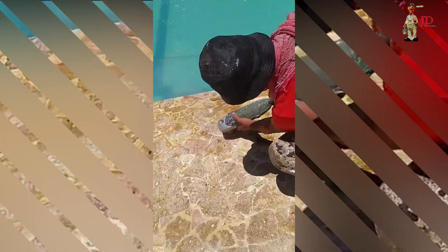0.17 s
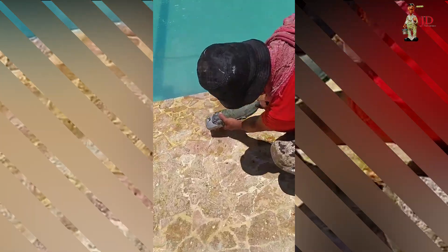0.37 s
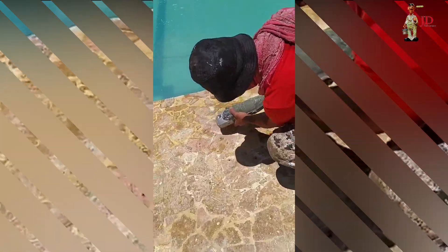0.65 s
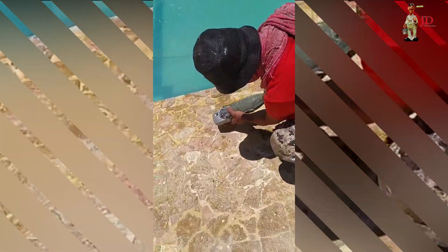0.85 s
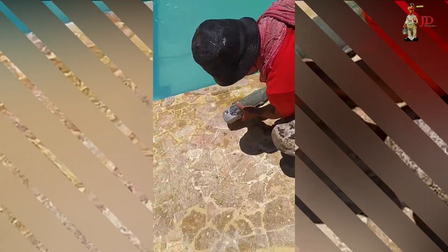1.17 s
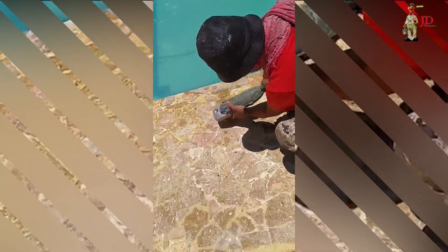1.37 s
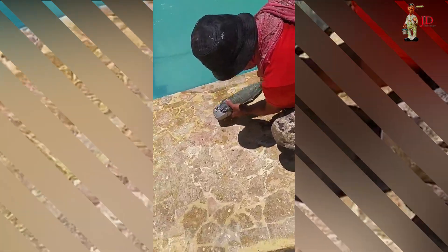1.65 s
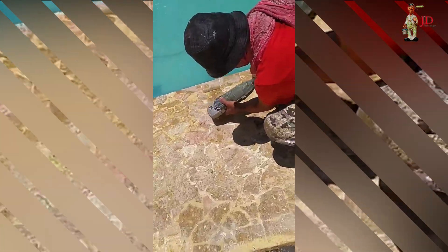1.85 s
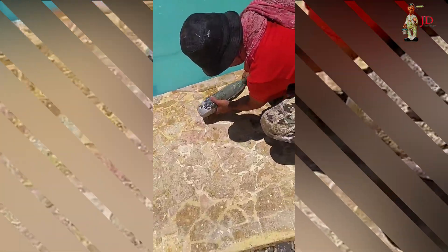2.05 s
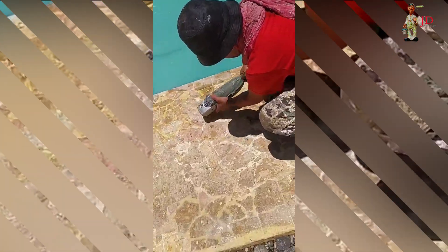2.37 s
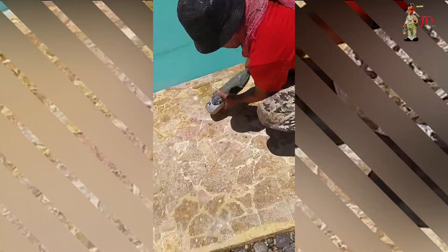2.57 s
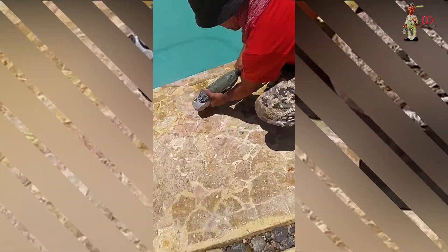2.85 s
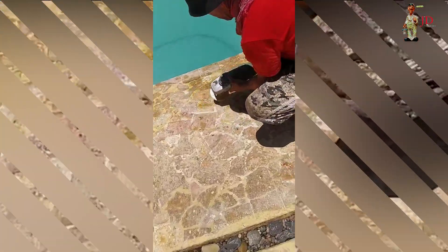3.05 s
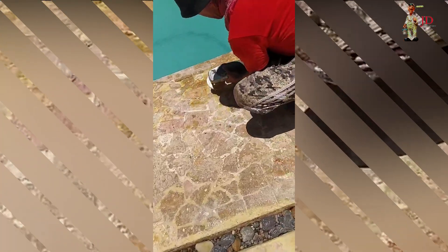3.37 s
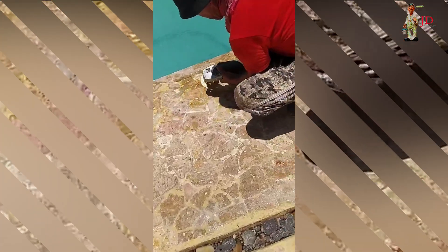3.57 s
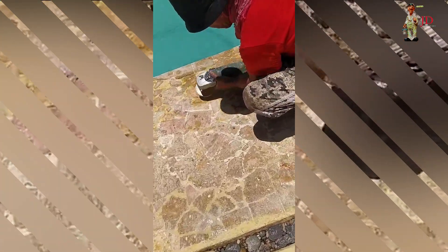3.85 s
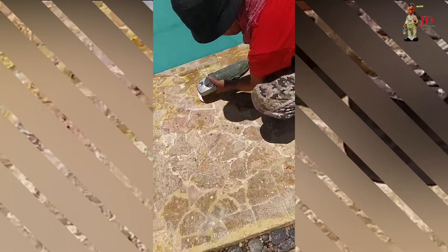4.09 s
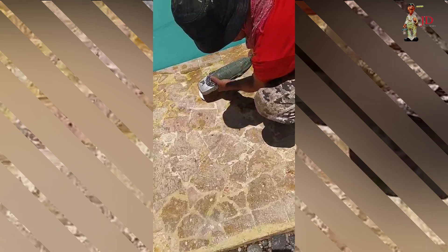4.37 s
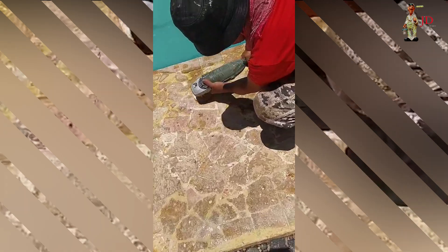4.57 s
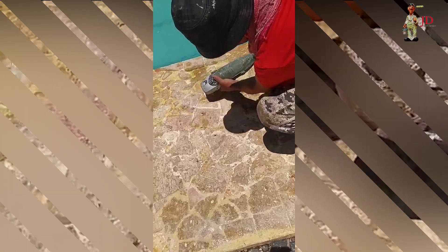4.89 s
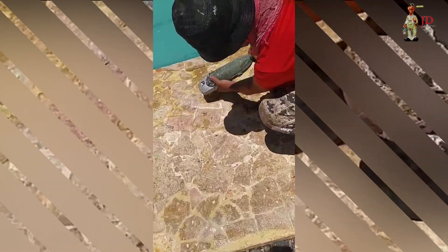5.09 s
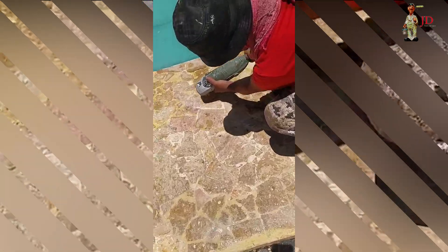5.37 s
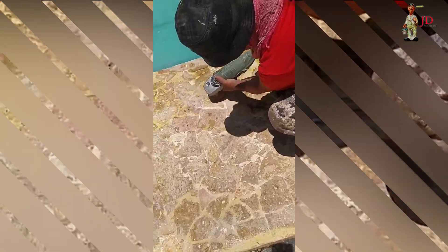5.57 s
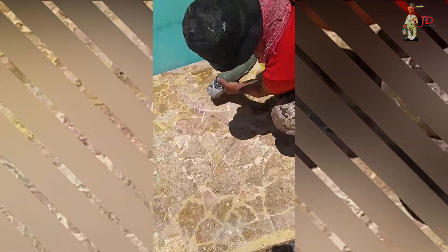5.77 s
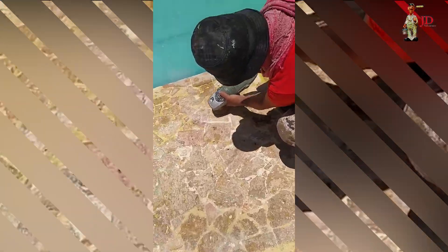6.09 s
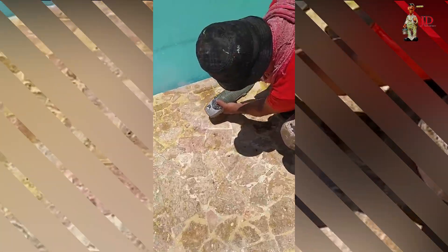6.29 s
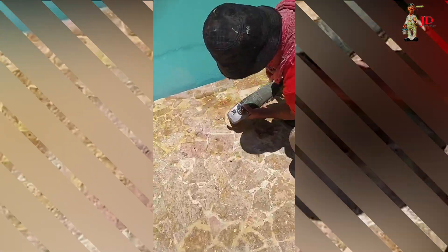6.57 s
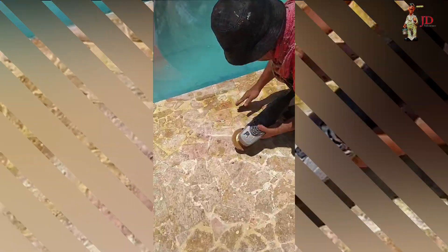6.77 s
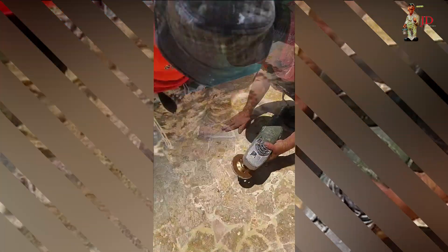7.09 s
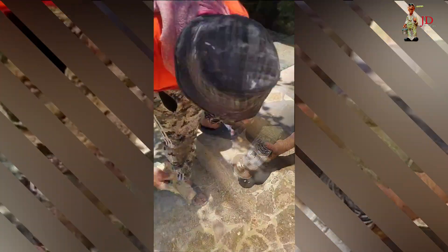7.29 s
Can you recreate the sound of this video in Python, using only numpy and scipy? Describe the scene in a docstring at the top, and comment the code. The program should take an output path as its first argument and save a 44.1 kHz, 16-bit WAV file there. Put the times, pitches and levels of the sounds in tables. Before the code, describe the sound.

Close, loud grinder cutting grout between stone slabs: shrill wavering whine, gritty chatter and dusty hiss, stopping dead before a very quiet tail.

```python
"""A fan whine sags and races over a rasping chatter: an angle grinder cuts grout between stone slabs outdoors.
Whine: sine lines at multiples of the shaft rate. Rasp: coloured noise driven by random knocks, plus ringing taps.
Air and dust hiss, the slab rumbles and a breeze nudges the microphone, all as filtered noise.
The grinder's sound is cut off abruptly; after a short gap a faint metallic sizzle, scuffs and a far whine remain."""
import sys
import numpy as np
from scipy import signal
from scipy.fft import rfft, irfft
from scipy.io import wavfile
from scipy.ndimage import uniform_filter1d, map_coordinates

SR = 44100
rng = np.random.default_rng(int(sys.argv[2]) if len(sys.argv) > 2 else 0)


def log_audio(samples):
    """Write samples as a 16-bit WAV file to the path given in sys.argv[1]."""
    # one column per channel
    frames = np.atleast_2d(samples).T
    # limit to full scale, then quantise
    limited = np.clip(frames, -1, 1)
    pcm = np.round(limited * 32767).astype(np.int16)
    wavfile.write(sys.argv[1], SR, pcm)


N = 327663
TIME, FREQ = np.arange(N) / SR, np.fft.rfftfreq(N, 1 / SR)  # s, Hz

BLADES = 14  # of the cooling fan
JUDDER_RATIO, JUDDER_DEPTH = .0088, .13  # bounce rate as a share of the whine's frequency; depth 0-1
FIRM_DB, CRUISE_HZ = -15.5, 5320  # bite and whine in steady grinding
RASP_S = 0.06  # half-length of a catch
FLARE_DUCK_DB = 3.5  # how far the disc's other ringing gives way to a flare
CALM_DB = -57.5  # breeze between gusts, on the scale of the gusts
SIZZLE_DB = -41
CUT_S, RESUME_S = 7.199, 7.239  # the grinder's sound is cut off; the quiet end is heard
EDGE_HZ = 15660  # band limit

# Blade-passing tone; the motor sags when pressed, races when lifted. Each row: time in seconds, frequency in Hz.
WHINE = [(0.0, 4870), (0.06, 4894), (0.22, 4798), (0.41, 4855), (0.55, 5141), (0.67, 5301), (0.8, 5432),
         (0.98, 5274), (1.14, 5448), (1.24, 5523), (1.43, 5274), (1.49, 5265), (1.67, 5460), (1.73, 5491),
         (1.8, 5388), (1.84, 5387), (2.02, 5548), (2.14, 5517), (2.35, 5588), (2.49, 5292), (2.55, 5291),
         (2.63, 5111), (2.76, 5024), (2.86, 4829), (2.9, 4864), (2.98, 4788), (3.0, 4815), (3.14, 5198),
         (3.16, 5220), (3.35, 4815), (3.53, 4454), (3.76, 4047), (4.0, 3654), (4.02, 3645), (4.1, 4135),
         (4.18, 4531), (4.29, 4898), (4.39, 5150), (4.47, 5287), (4.53, 5357), (4.63, 5394), (4.76, 5390),
         (4.94, 5213), (5.06, 4930), (5.14, 4877), (5.24, 4933), (5.43, 4719), (5.53, 4704), (5.73, 4548),
         (5.84, 4577), (5.9, 4466), (6.02, 4401), (6.18, 4485), (6.24, 4418), (6.31, 4506), (6.41, 4478),
         (6.49, 4564), (6.55, 4467), (6.59, 4564), (6.67, 4855), (6.76, 5110), (6.86, 5336), (6.96, 5523),
         (7.18, 5793)]
# Fan tone at the ears as the tool is turned. Each row: time in seconds, left level in dB, right level in dB.
TONE = [(0.0, -29, -26.0), (0.49, -26.5, -23.0), (0.53, -23, -18.5), (0.89, -30.5, -25.5), (1.21, -20, -30),
        (1.25, -33.5, -33), (1.49, -23, -23.5), (2.13, -33, -28), (2.41, -25, -25), (2.61, -20.5, -27),
        (2.77, -34, -27.0), (2.89, -27.0, -20), (2.93, -25, -31.5), (3.05, -34, -23), (3.17, -28, -29),
        (3.25, -44, -26.0), (3.37, -22, -20), (3.45, -18.5, -26), (3.65, -24, -22.5), (3.85, -17, -34),
        (3.97, -31.5, -28), (4.13, -21, -26), (4.17, -35, -33), (4.33, -25.0, -16.5), (4.45, -20, -33.0),
        (4.53, -22, -30), (4.85, -23, -30), (4.93, -40, -30), (5.01, -21, -21), (5.05, -21, -28.0),
        (5.21, -19.5, -19), (5.61, -22.5, -23), (5.89, -28.0, -33.5), (5.93, -32.0, -24.0),
        (6.17, -23, -21.0), (6.37, -31, -29.0), (6.57, -23, -23), (6.65, -22, -33.5), (6.73, -31, -15.5),
        (6.77, -19.0, -19), (6.89, -26, -27.0), (7.18, -28.0, -27.5)]
# The fan tone reaches the ears out of step. Each row: time in seconds, lead of the left in radians.
TONE_LEAD = [(0.48, 0.87), (0.7, 2.0), (1.9, 1.7), (3.0, 0.32), (3.35, -1.7), (5.3, -0.4), (6.1, 1.3)]
# The fan's octave, beaming as the tool is turned. Each row: time in seconds, left and right in relative dB.
OCTAVE = [(0.0, -27, -27.5), (1.89, -30.0, -31.0), (2.33, -26, -24), (2.69, -33.5, -26), (2.77, -25.0, -25),
          (2.89, -32.0, -29), (3.01, -21.0, -24.0), (3.13, -41, -29), (3.29, -20.5, -30.5),
          (3.37, -26, -18), (3.49, -12, -17), (3.81, -11, -28.0), (3.93, -12, -22), (4.09, -16, -23),
          (4.17, -9.5, -13), (4.49, -41, -37), (4.57, -28, -28), (4.85, -32, -34), (4.97, -31.0, -35),
          (5.25, -27, -29), (5.57, -29, -23), (5.73, -19, -36), (6.45, -11.5, -21), (6.77, -28, -25),
          (7.18, -34.5, -35.5)]
# Glints of the highest whistle with the angle of the vents. Each row: time in seconds, relative level in dB.
GLINTS = [(0.58, 7), (3.16, 5), (3.87, 2), (3.98, 0), (4.28, -3)]
# What the vents pass of the highest whistle. Each row: frequency in Hz, gain in dB.
VENTS = [(11500, -2), (12300, -2), (13500, -3), (15500, -13)]
# Shaft hum. Each row: time in seconds, once-a-turn line and twice-a-turn line in relative dB.
HUM = [(0, -9, -5), (1, -5, 0), (2.8, -12, 2), (3.4, -4.5, 7), (3.75, -1, 1), (4.12, -2, -1),
       (4.3, -4, 4.5), (4.7, -5, 4.5), (5.6, -9, 5), (6.7, -15, 6), (7.2, 4, -15)]
# What the motor casing radiates. Each row: frequency in Hz, gain in dB.
CASING = [(500, -7), (630, -16), (710, -12), (770, -8), (850, -1)]
# How firmly the disc bites, as the level of its ringing. Each row: time in seconds, level in dB.
BITE = [(0.03, -15.5), (0.43, -16.5), (2.96, -15.5), (3.89, -23), (4.37, -16), (6.38, -16), (7.18, -24)]
# Spectrum of the scrape. Each row: frequency in Hz, relative dB per Hz.
SCRAPE = [(25, -29), (70, -25), (125, -32), (200, -5), (330, -9), (440, -1), (650, 0.5), (900, 4),
          (1150, 3.5), (1500, 6), (2800, 8), (3500, -9.5), (6000, -42)]
# Spectrum of the ringing disc. Each row: frequency in Hz, relative dB per Hz.
DISC = [(1000, -30.5), (1500, -16.5), (1780, -0.5), (2100, 1.5), (2450, -1), (2850, -3.5), (3150, -4),
        (3450, -43), (4300, -5.5), (5500, -18), (9000, -16), (14000, -36)]
# Disc spinning in air. Each row: frequency in Hz, relative dB per Hz.
WHIR = [(1400, -20.5), (2350, 2.5), (2800, 3), (3400, -20)]
# Leaned on, the disc flares up on its note. Each row: time in seconds, level in dB, half-length in seconds.
FLARES = [(2.613, -23, 0.1), (2.92, -18.5, 0.099), (4.786, -18.5, 0.092), (5.098, -17, 0.092),
          (5.292, -21, 0.045), (5.563, -17.5, 0.091), (5.92, -22, 0.049), (6.292, -26, 0.022),
          (6.497, -19.5, 0.062)]
# The disc catches on hard stone and rasps. Each row: time in seconds, lift in dB.
CATCHES = [(1.36, 1.5), (1.75, 1), (5.66, 2), (5.94, 1.5), (6.16, 3), (6.33, 3)]
# The disc skips clear of the stone: times in seconds.
SKIPS = [1.755, 2.23, 2.572, 4.875, 5.15, 5.39, 5.825]
# How hard the bouncing disc lands. Each row: time in seconds, relative level in dB.
BOUNCE = [(0, 9.5), (2.4, -22), (2.6, 2), (3.0, 4), (3.3, -12), (4.3, -8), (4.5, -2), (5.55, 3.5),
          (5.85, 3.5), (6.5, 5), (6.8, -14)]
# The disc chips off a hard grain. Each row: time in seconds, peak of the tap in dB.
CHIPS = [(1.339, -8), (1.4052, -6), (1.468, -2), (1.867, -4), (2.5576, -1.5), (2.739, -5), (2.803, -1),
         (3.022, -3), (4.5256, -2), (4.85, -2), (5.1133, -4), (5.49, -2), (5.5338, -4.5), (5.704, -9),
         (5.863, 1), (6.4712, -7)]
# What a knock rings in disc and stone. Each row: frequency in Hz, relative level in dB.
KNOCK = [(100, -38), (450, -32.5), (900, -9), (1450, -17.5), (1850, 4), (2150, 7), (2900, -10.5),
         (3500, -11.5), (4400, -12.5), (6000, -31), (9000, -24), (13000, -35)]
# Where the tool stands. Each row: time in seconds, lead of the left ear in ms, hiss left minus right in dB.
PLACE = [(0, 0.063, 1), (1.5, 0.044, 1.5), (2.8, -0.0031, 2.5), (3.8, -0.052, 4), (5, -0.037, 1.5),
         (6, -0.016, 0), (7.2, 0.14, 1)]
# Spectrum of air and dust. Each row: frequency in Hz, relative dB per Hz.
HISS = [(2500, -24.5), (3700, -5), (4400, -9.5), (5400, -8), (6500, -3), (7500, -3.5), (8200, -0.5),
        (8950, 0.5), (9500, -2.5), (10000, -6.5), (10600, -14), (11800, -16.5), (13600, -18), (15500, -41)]
# Housing resonances in the hiss. Each row: frequency in Hz, width in Hz, lift in dB.
HOUSING = [(8960, 670, 3.5), (12700, 210, 3)]
# Vent whistle: frequency in Hz, width in Hz, dB above the hiss, peak time in seconds, half-length in seconds.
VENT_WHISTLE = (7470, 130, -14, 1.5, 1.8)
# The stream of dust comes and goes. Each row: time in seconds, change in dB, half-length in seconds.
SPURTS = [(3.275, 2, 0.19), (4.306, 1.5, 0.079)]
# Dull rumble carried by the slab. Each row: time in seconds, level in dB.
SLAB = [(0.0, -41), (2.4, -37), (2.9, -46), (4.4, -53), (4.8, -39), (6.6, -43.5), (7.18, -37)]
# Spectrum of that rumble. Each row: frequency in Hz, relative dB per Hz.
THUD = [(60, -31), (125, -12), (170, -1.5), (235, -2), (300, 0), (450, -21.5)]
# Left-right likeness of noise. Each row: frequency in Hz, correlation.
ALIKE = [(40, 0.11), (100, 0.72), (250, 0.46), (600, 0.42), (1200, 0.58), (2400, 0.85), (4000, 0.39),
         (7000, 0.15), (15000, 0.32)]
# Gusts on the microphone. Each row: peak time in seconds, relative level in dB, half-length in seconds.
GUSTS = [(2.95, -50.5, 0.38), (3.878, -46, 0.07), (4.3, -44, 0.23), (6.08, -45, .04), (6.425, -46, 0.12),
         (6.8, -46, .05), (7.37, -39, 0.041)]
# Spectrum of the gusts. Each row: frequency in Hz, relative dB per Hz.
BUFFET = [(20, -13), (55, -15), (80, -10), (99, 11), (116, -3), (140, -15), (400, -52)]
# Spectrum of the sizzle. Each row: frequency in Hz, relative dB per Hz.
SIZZLE = [(88, -47), (150, -15), (477, -29), (772, -25), (850, -31), (1570, -29), (2550, -35), (3970, -34),
          (4630, -42), (5610, -30), (6550, -11), (7640, -19), (8750, -32), (10600, -33), (15000, -57)]
# Ringing lines of the disc in the sizzle. Each row: frequency in Hz, relative level in dB.
SIZZLE_LINES = [(5900, -53), (6481, -51), (6578, -39)]
# Scuffs in the quiet end. Each row: time in seconds, level in dB, centre in Hz, decay in seconds.
SCUFFS = [(7.24, -48, 2240, 0.018), (7.272, -36, 8550, 0.01), (7.329, -44, 3600, .002),
          (7.337, -42, 3600, .002)]
# Far whine in the quiet end. Each row: onset in seconds, frequency in Hz, level in dB.
FAR_WHINE = [(7.33, 1590, -60), (7.37, 780, -58)]


def amp(db):
    """Decibels to gain."""
    return 10 ** (np.asarray(db) / 20)


def unit(x):
    """Scales to rms 1."""
    return x / np.sqrt(np.mean(x ** 2) + 1e-20)


def bump(s, half_s):
    """A smooth bell of height 1, centred on time s."""
    return np.exp(-((TIME - s) / half_s) ** 2 / 2)


def curves(rows):
    """Each column of a time table, at every sample."""
    s, *columns = np.transpose(rows)
    return [np.interp(TIME, s, column) for column in columns]


def spectrum(points, at_hz=FREQ):
    """A frequency table, read at the given frequencies on a log axis."""
    hz, value = np.transpose(points)
    return np.interp(np.log(at_hz + 1), np.log(hz), value)


def colour(x, db):
    """Filters by a dB curve; rms 1."""
    return unit(irfft(rfft(x) * amp(db), N))


def drift(rate_hz, size=8192):
    """Smooth chance, rms 1, up to about rate_hz."""
    coarse = rfft(rng.standard_normal(size))
    coarse = irfft(coarse / (1 + (FREQ[:len(coarse)] / rate_hz) ** 4))
    return unit(np.interp(np.arange(N) * size / N, np.arange(size), coarse))


def noise_pair(lead_ms=0):
    """White noise at two ears, alike as the table says; the left one may hear it earlier."""
    a, b = rfft(rng.standard_normal((2, N)))
    alike = np.clip(spectrum(ALIKE), -1, 1)
    shared = a * np.sqrt((1 + alike) / 2)
    apart = b * np.sqrt((1 - alike) / 2)
    later = np.exp(-2j * np.pi * FREQ * lead_ms / 1000)
    return irfft(np.array([shared + apart, (shared - apart) * later]), N)


def panned(x, db):
    """Makes the left louder than the right by db."""
    return x * amp(np.array([db, -db]).reshape(2, -1) / 2)


def resonate(x, hz, width_hz):
    """A resonance whose centre follows the curve hz: shift to zero, low-pass, shift back."""
    turn = np.exp(2j * np.pi * np.cumsum(hz) / SR)
    r = np.exp(-np.pi * width_hz / SR)
    return 2 * (turn * signal.lfilter([1 - r], [1, -r], x / turn)).real


def ring(points):
    """The short minimum-phase ring of a body with this spectrum after one sharp tap; peak 1."""
    cepstrum = irfft(np.log(amp(spectrum(points))), N)[:2048]
    cepstrum[0] = 0
    tap = irfft(np.exp(2 * rfft(cepstrum, N)), N)[:1024]
    return tap / abs(tap).max()


def worked(whine_hz, per_bite, per_speed_db):
    """Level change in dB from steady grinding: a share of the bite, and so many dB per doubling of speed."""
    return per_bite * (curves(BITE)[0] - FIRM_DB) + per_speed_db * np.log2(whine_hz / CRUISE_HZ)


def motor(whine_hz, jitter=0.00088, hunting=0.000398, flutter_db=2.5, fade_db=2.0, swing_rad=0.13,
          octave_db=-1.5, third_db=-33, third_rest_db=-45, glint_s=0.046, sixth_db=-35,
          second_db=-37, hum_db=-45, shudder_db=-47, shudder_s=3.58, shudder_half_s=.1):
    """Fan tone, its overtones and the shaft's lines; the speed hunts and trembles and each line flutters."""
    shaft_hz = whine_hz / BLADES
    turns = np.cumsum(shaft_hz * (1 + jitter * drift(48) + hunting * drift(6.9))) / SR

    def line(order, db, lead_rad=0):
        """One multiple of the shaft rate, wavering on its own at each ear; the left leads by lead_rad."""
        phase = 2 * np.pi * (order * turns + rng.random()) + .3 * np.array([drift(12), drift(12)])
        phase += lead_rad * np.array([[.5], [-.5]])
        flutter = flutter_db * np.array([drift(24), drift(45)])
        return np.sqrt(2) * amp(db + flutter) * np.sin(phase)

    def radiated(order, db, body):
        """A line is loud where the body that radiates it is."""
        return line(order, db + spectrum(body, shaft_hz * order))

    swing = swing_rad * drift(6.4)  # the echo off the slab shifts with every move of the hand
    fan = line(BLADES, np.array(curves(TONE)), lead_rad=curves(TONE_LEAD)[0] + swing)
    fan += line(2 * BLADES, np.array(curves(OCTAVE)) + octave_db, lead_rad=2 * swing)
    glints = amp(third_rest_db) + sum(amp(third_db + db) * bump(s, glint_s) for s, db in GLINTS)
    fan += glints * radiated(3 * BLADES, db=0.5, body=VENTS)

    once_db, twice_db = (db + fade_db * drift(7.3) for db in curves(HUM))  # the low lines fade in and out
    hum = line(1, hum_db + once_db) + radiated(2, second_db + twice_db, CASING)
    hum += line(.5, shudder_db) * bump(shudder_s, shudder_half_s)  # a brief shudder as the motor slows
    return fan + hum + radiated(6, sixth_db, DISC)


def chatter(whine_hz, knocks_per_s=420, spread_db=2.8, knock_s=0.0011, steady=2.6):
    """Contact force: the disc knocks on grains of stone, and the tool judders in step with its speed."""
    size = amp(spread_db * np.minimum(rng.exponential(1, N), 3.5))
    hits = (rng.random(N) < knocks_per_s / SR) * size ** 2
    power = signal.lfilter([1], [1, -np.exp(-1 / (knock_s * SR))], hits)
    bounce = 1 + JUDDER_DEPTH * np.sin(2 * np.pi * np.cumsum(whine_hz * JUDDER_RATIO) / SR)
    return unit(np.sqrt(steady + power / power.mean()) * bounce)


def contact(whine_hz, wobble=0.11, wander=.12, skip_db=-6, skip_s=0.0042):
    """Share of the rim that touches: it wobbles unevenly while the tool bounces, and now and then skips clear."""
    wobble_hz = 2 * JUDDER_RATIO * whine_hz * (1 + wander * drift(20.1))
    depth = np.clip(wobble * amp(curves(BOUNCE)[0]), 0, .5)
    skips = amp(skip_db * sum(bump(s, skip_s) for s in SKIPS))
    return skips * (1 + depth * np.sin(2 * np.pi * np.cumsum(wobble_hz) / SR))


def grinding(whine_hz, force, scrape_db=-21.5, free_hz=2330, loaded_hz=1900, flare_drop_hz=30,
             flare_width_hz=190, lean_db=-0.7):
    """The contact scrapes broadly and rings the disc, whose note sinks and sharpens as it is pressed down."""
    bite_db, = curves(BITE)
    load = np.clip((5600 - whine_hz) / 1100, 0, 1)
    pressed = np.clip((bite_db + 21.0) / 5, 0, 1)  # a light touch does not make it sing

    scrape = colour(noise_pair() * (0.36 + 0.49 * force), spectrum(SCRAPE))
    catches_db = sum(db * bump(s, RASP_S) for s, db in CATCHES)
    scrape_level_db = worked(whine_hz, per_bite=0.21, per_speed_db=5.5) + catches_db + scrape_db

    disc = colour(noise_pair() * force, spectrum(DISC))
    note_hz = free_hz + (loaded_hz - free_hz) * load
    note = unit(resonate(colour(noise_pair() * force, spectrum(DISC)), note_hz, width_hz=500))
    share = np.clip(0.046 * load * pressed, 0, 1)
    disc = np.sqrt(1 - share) * disc + np.sqrt(share) * note
    lifted = np.clip((1 - load) * (1 - pressed), 0, 1)  # off the stone the disc only whirs, higher up
    disc = np.sqrt(1 - lifted) * disc + np.sqrt(lifted) * colour(noise_pair(), spectrum(WHIR))

    flare_hz = note_hz - flare_drop_hz
    flare = resonate(noise_pair() * force, flare_hz, flare_width_hz)
    flare = unit(resonate(flare, flare_hz, flare_width_hz))
    flare *= sum(amp(db) * bump(s, half_s) for s, db, half_s in FLARES)
    disc_level_db = bite_db - FLARE_DUCK_DB * sum(bump(s, half_s) for s, _, half_s in FLARES)
    return panned(amp(scrape_level_db) * scrape + amp(disc_level_db) * disc + flare, lean_db)


def knocks(whine_hz, bounce_db=-14, spread_db=4, scatter_s=0.000848, grain_db=-22, grains_per_s=260,
           grain_spread_db=3, lean_db=-3.0):
    """The disc lands once in each bounce, ticks over grains in between, and now and then chips one off."""
    grains = (rng.random(N) < grains_per_s / SR) * rng.choice([-1, 1], N)
    grain_size_db = grain_spread_db * np.minimum(rng.exponential(1, N), 3)
    taps = grains * amp(grain_db + curves(BITE)[0] - FIRM_DB + grain_size_db)

    landings = np.flatnonzero(np.diff(np.floor(np.cumsum(whine_hz * JUDDER_RATIO) / SR)))
    late, size = np.clip(rng.standard_normal((len(landings), 2)), -2, 1.5).T
    at = np.clip(landings + (late * scatter_s * SR).astype(int), 0, N - 1)
    taps[at] += amp(bounce_db + curves(BOUNCE)[0][at] + spread_db * size)

    for s, db in CHIPS:
        taps[round(s * SR)] += amp(db)
    return panned(signal.oaconvolve(taps, ring(KNOCK))[:N], lean_db)


def hiss(whine_hz, force, hiss_db=-14.5, grit_share=0.11, flicker_db=1.42):
    """Cooling air and flying dust rush past the housing; at one angle a vent whistles hoarsely."""
    housing_db = sum(db / (1 + (2 * (FREQ - hz) / width_hz) ** 2) for hz, width_hz, db in HOUSING)
    rush = noise_pair(lead_ms=.28)
    air = colour(rush * (1 - grit_share + grit_share * force), spectrum(HISS) + housing_db)
    hz, width_hz, db, s, half_s = VENT_WHISTLE
    air += amp(db) * bump(s, half_s) * unit(resonate(rush, np.full(N, hz), width_hz))
    level_db = hiss_db + worked(whine_hz, per_bite=0.41, per_speed_db=2.5) + flicker_db * drift(17)
    level_db += sum(db * bump(s, half_s) for s, db, half_s in SPURTS)
    return panned(air * amp(level_db), curves(PLACE)[1])


def slab(force, lean_db=5, drone_hz=237, width_hz=20, drone_db=-42, peak_s=2.15, half_s=0.37):
    """The contact force also shakes the stone, which rumbles dully and for a while drones on one note."""
    rumble = colour(noise_pair() * force, spectrum(THUD)) * amp(curves(SLAB)[0])
    drone = colour(noise_pair() * force, -20 * np.log10(1 + ((FREQ - drone_hz) * 2 / width_hz) ** 2))
    return panned(rumble + drone * amp(drone_db) * bump(peak_s, half_s), lean_db)


def breeze(breeze_db=-2, lean_db=2, restless_db=1.0):
    """Small gusts thrum in the microphone ports, over a restless light breeze."""
    thrum = colour(noise_pair(), spectrum(BUFFET))
    thrum /= np.sqrt(uniform_filter1d(thrum ** 2, size=6000).mean(0))  # evens out its own swells
    gust_power = sum((amp(db) * bump(s, half_s)) ** 2 for s, db, half_s in GUSTS)
    strength = np.sqrt(gust_power + amp(CALM_DB + restless_db * drift(2.9)) ** 2)
    return panned(thrum * strength * amp(breeze_db), lean_db)


def sizzle(lines_db=-1):
    """A faint metallic rubbing, as coloured noise, with a few singing sine lines."""
    rub = colour(noise_pair(), spectrum(SIZZLE)) * amp(SIZZLE_DB)
    ear_turns = np.array([[0], [.2]])  # the right ear is a fifth of a cycle ahead
    sing = sum(amp(db + lines_db) * np.sin(2 * np.pi * (hz * TIME + rng.random() + ear_turns))
               for hz, db in SIZZLE_LINES)
    return rub + np.sqrt(2) * sing


def small_sounds():
    """Brief scuffs, as decaying bands of noise, and a thin far whine of sines."""
    out = np.zeros((2, N))
    air = noise_pair()
    for s, db, hz, decay_s in SCUFFS:
        band = colour(air, -10 * np.log10(1 + ((FREQ - hz) / 600) ** 4))
        out += band * amp(db) * np.exp(-abs(TIME - s) / decay_s) * (TIME > s)
    for s, hz, db in FAR_WHINE:
        fade_in = np.clip((TIME - s) / .03, 0, 1)
        out += np.sqrt(2) * amp(db) * fade_in * np.sin(2 * np.pi * hz * TIME)
    return out


def scene():
    """The working grinder, a short gap, and the quiet end."""
    whine_hz, = curves(WHINE)
    force = chatter(whine_hz)
    left, right = grinding(whine_hz, force) * contact(whine_hz) + knocks(whine_hz)
    lead_samples = curves(PLACE)[0] * SR / 1000
    left = map_coordinates(left, [np.arange(N) + lead_samples], order=3, mode="nearest")
    stone = np.array([left, right])
    tool = motor(whine_hz) + stone + slab(force) + hiss(whine_hz, force)
    wind = breeze()
    trace = amp(-32) * np.exp(-np.maximum(TIME - CUT_S, 0) / 0.011)  # a whisper lingers in the gap
    working = (tool + wind) * np.where(TIME < CUT_S, 1, trace)
    quiet_end = (sizzle() + small_sounds() + wind) * (TIME > RESUME_S)
    return working + quiet_end


def record(dry):
    """Peaks clip at full scale; then a low-pass sets the band limit."""
    low_pass = signal.firwin(511, EDGE_HZ, window=("kaiser", 9), fs=SR)
    return signal.oaconvolve(np.clip(dry, -1, 1), low_pass[None], "same")


dry = scene()
out = record(dry)
log_audio(out)
```